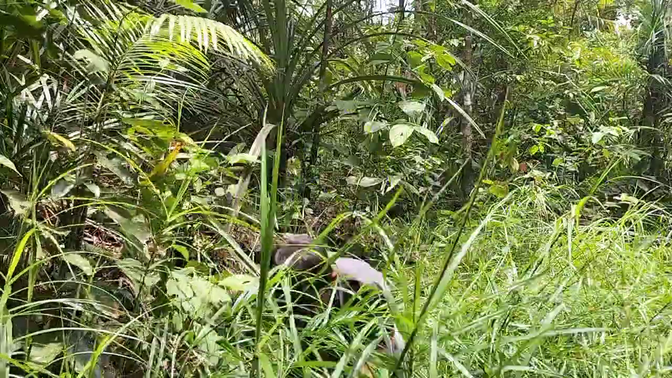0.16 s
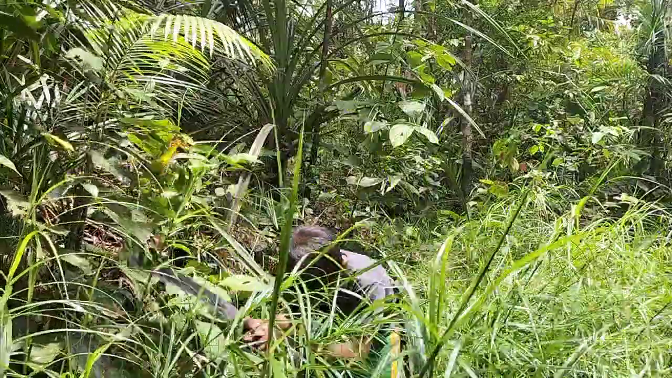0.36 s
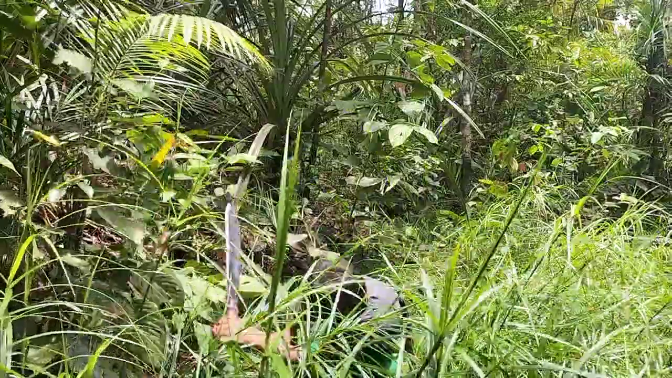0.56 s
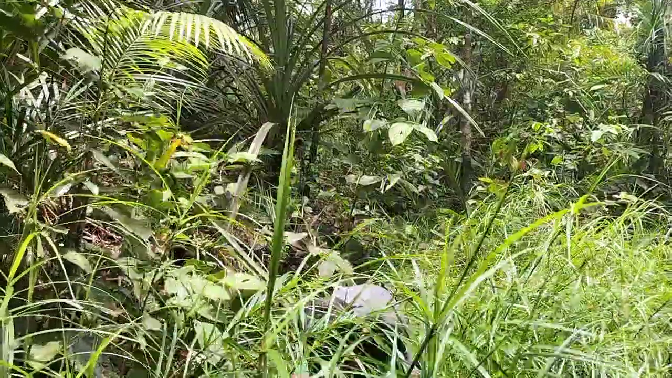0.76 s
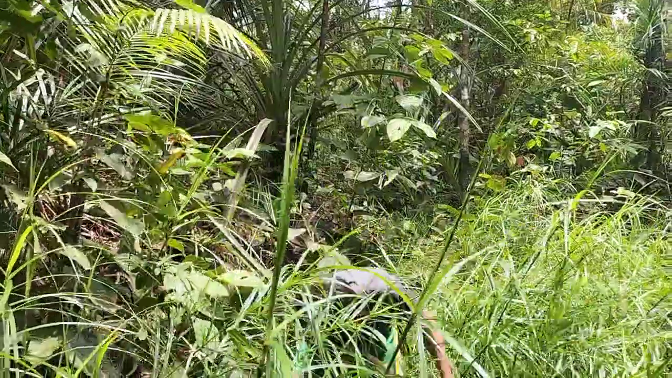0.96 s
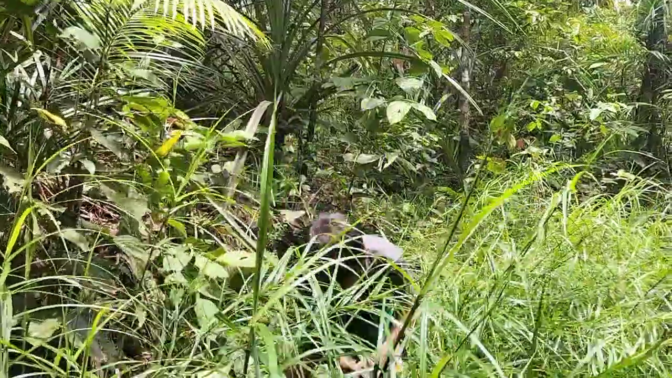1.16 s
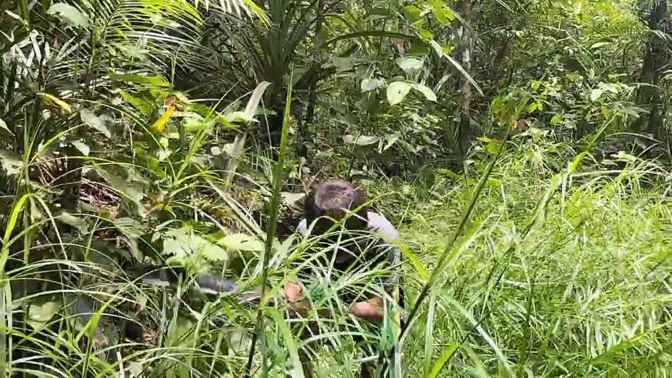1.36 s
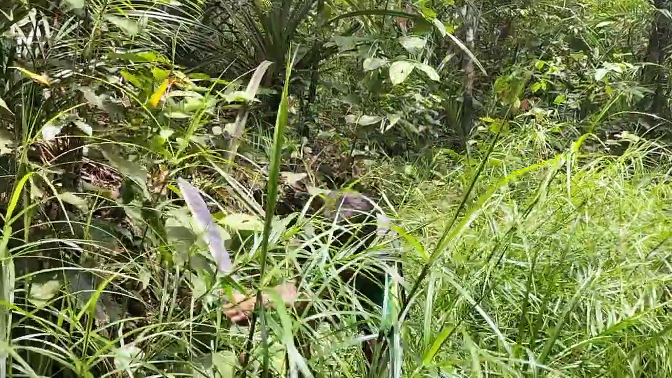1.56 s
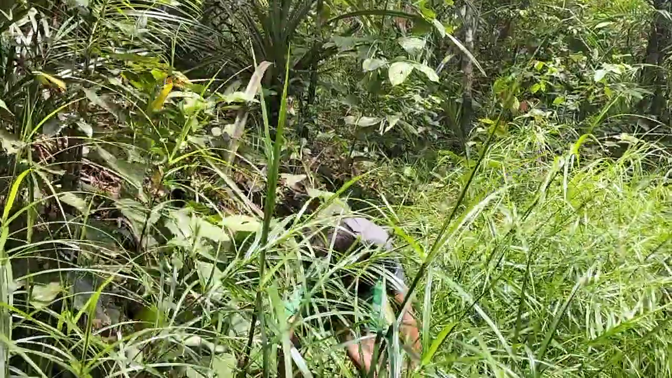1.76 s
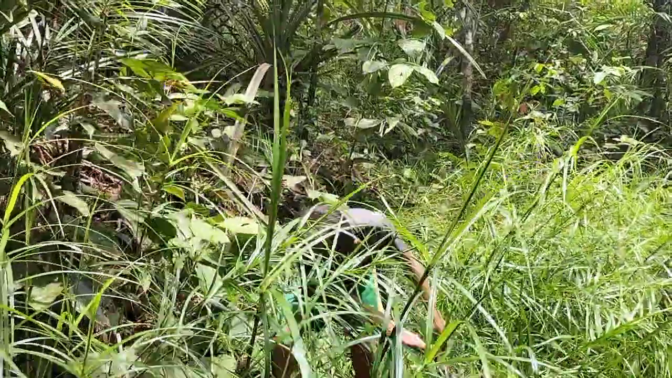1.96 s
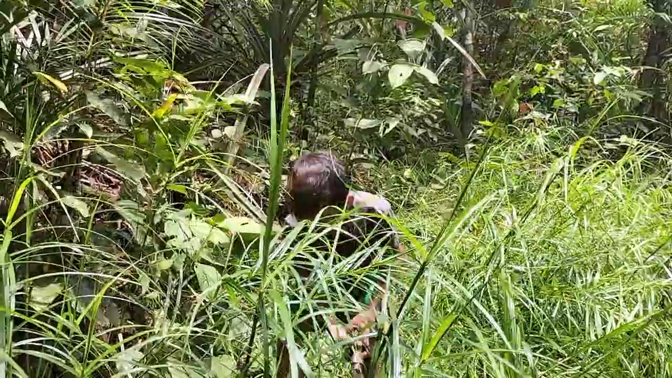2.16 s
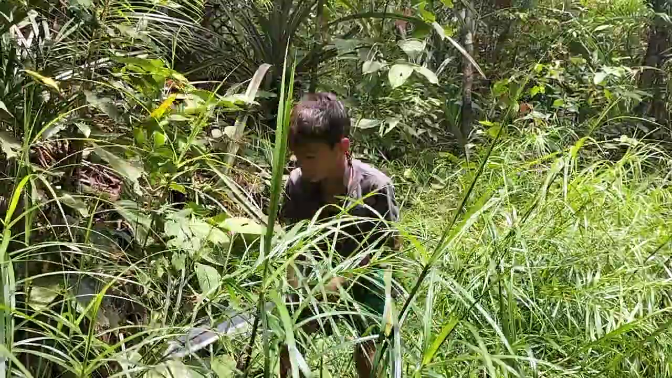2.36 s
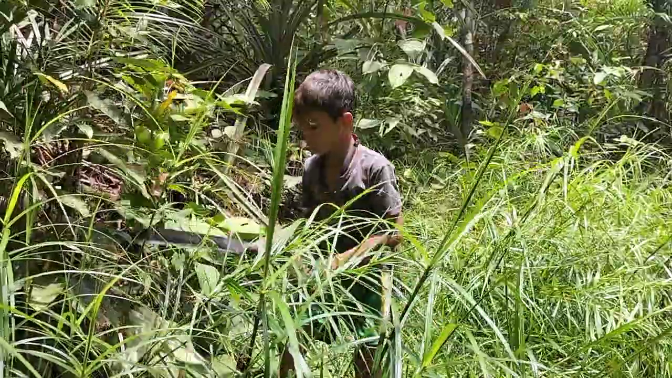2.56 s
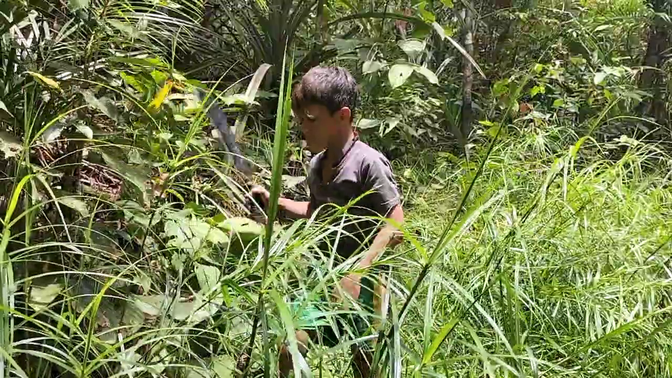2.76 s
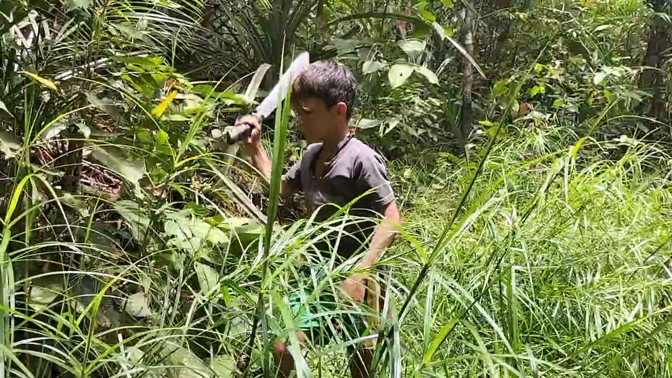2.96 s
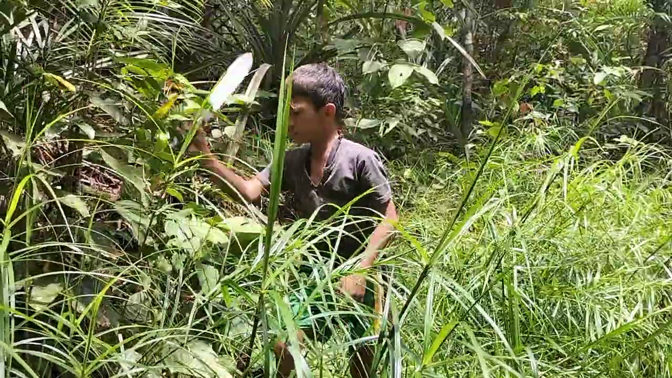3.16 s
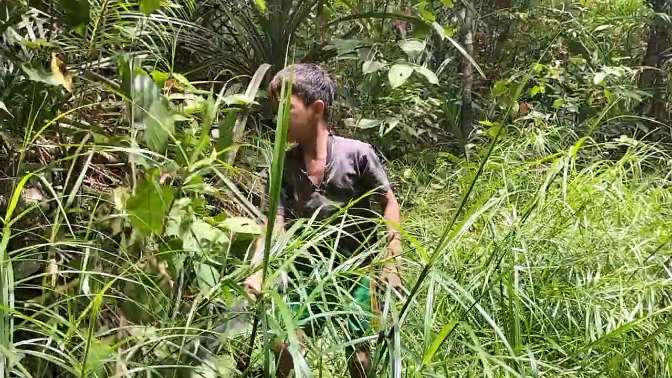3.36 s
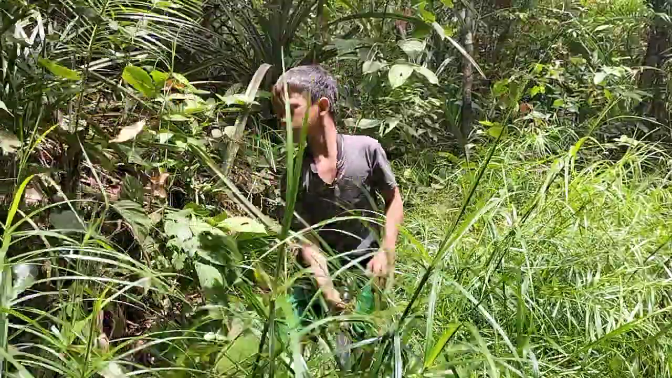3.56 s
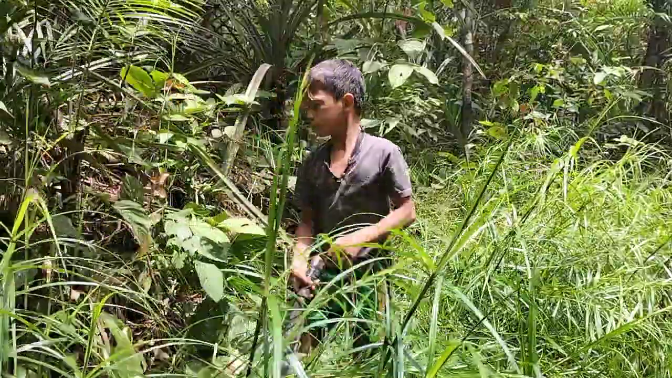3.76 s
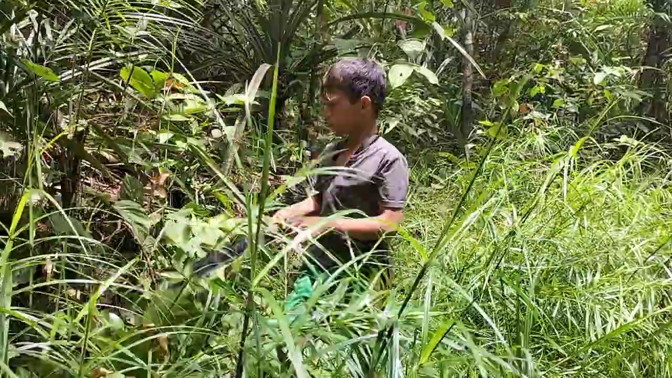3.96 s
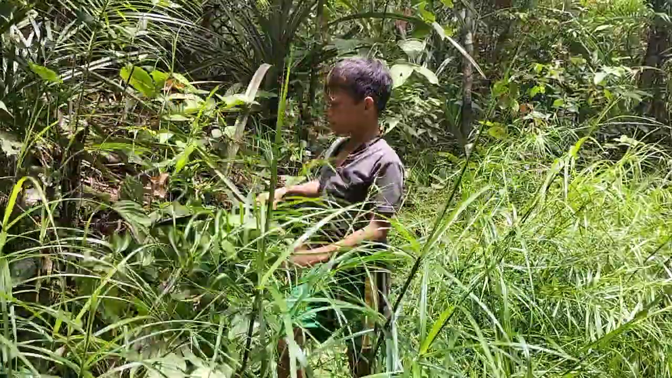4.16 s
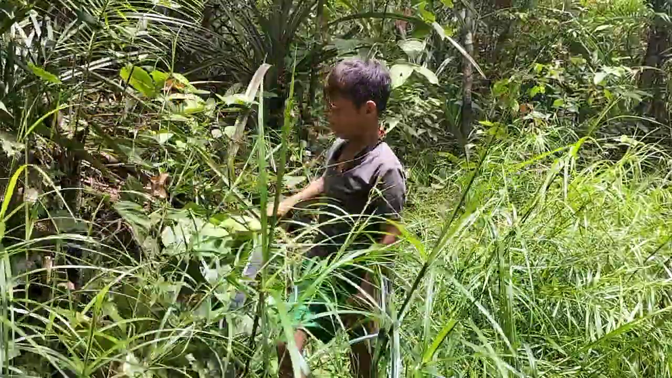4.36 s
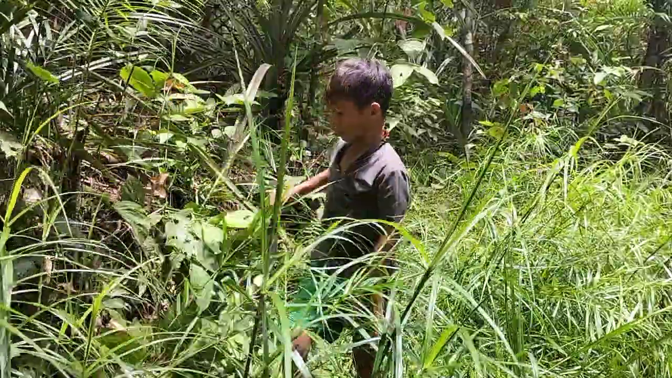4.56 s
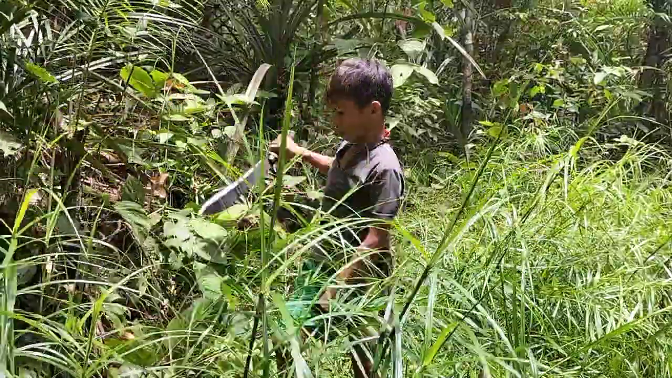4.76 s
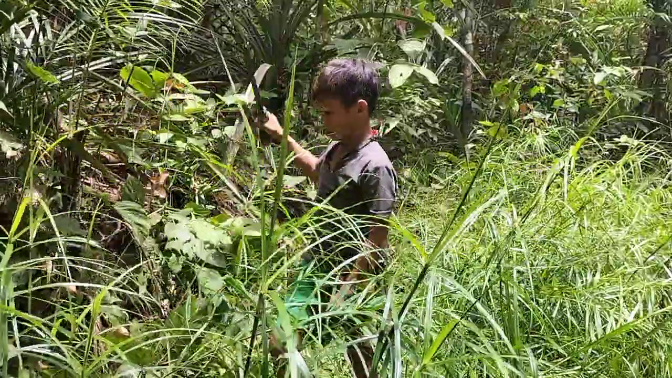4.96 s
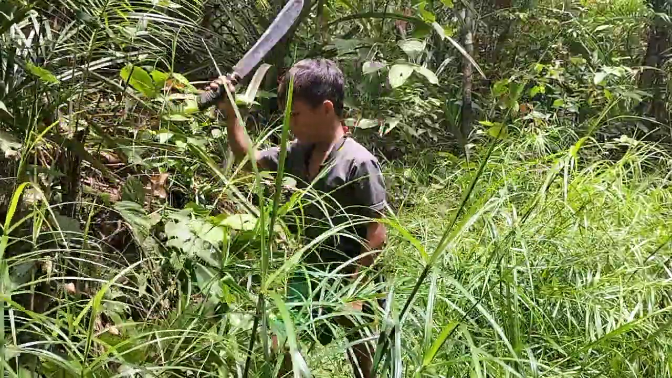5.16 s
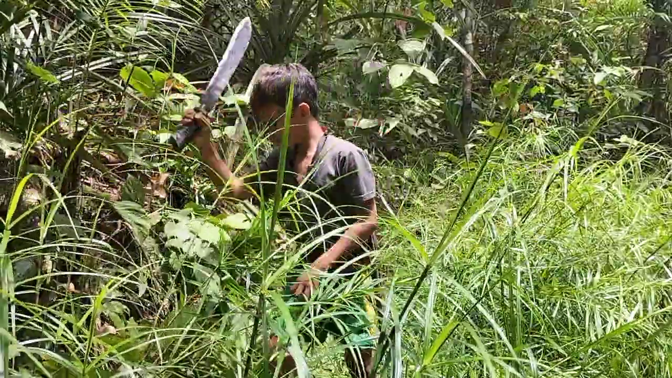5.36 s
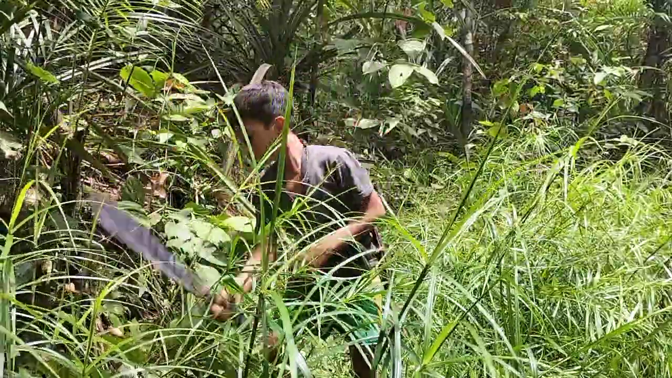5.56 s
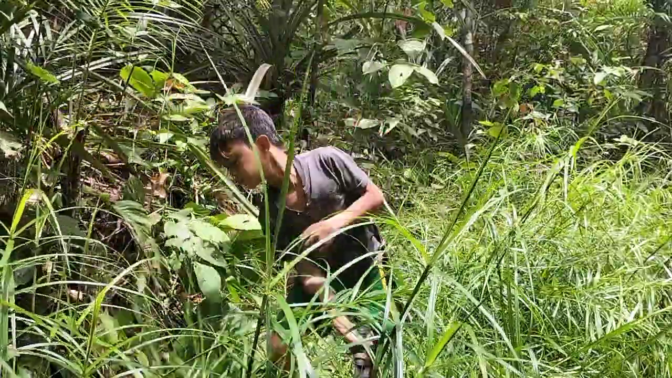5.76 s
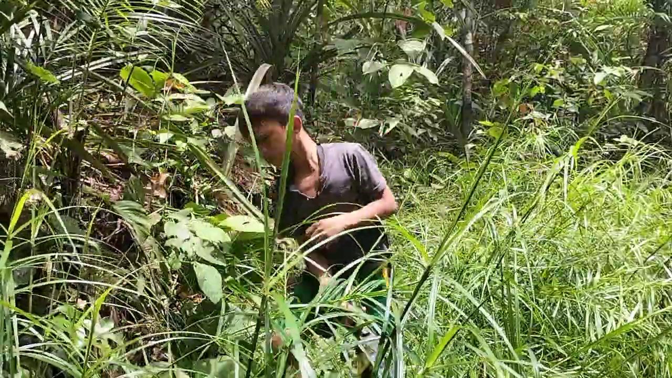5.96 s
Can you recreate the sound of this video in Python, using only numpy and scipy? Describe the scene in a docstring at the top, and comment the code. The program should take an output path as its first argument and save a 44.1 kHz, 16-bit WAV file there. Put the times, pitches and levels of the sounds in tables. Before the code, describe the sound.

Already mid-slash, a blade tears through leaves and stems, then four more strokes follow at uneven intervals, crunchy and bright with fibres snapping and soil thudding dully. Between them brush rustles, stalks scrape and sticks knock lightly. Quiet insects buzz steadily and a distant bird trills twice. Outdoors among trees, mono, fairly close, with only a faint diffuse echo.

```python
"""A blade slash tears into leaves and stems at once; four more strokes follow through grass and brush.
Leaves and stems are dense random grains of snapping fibre, filtered to the plant and left to settle.
Between strokes the brush rustles and scrapes, damped modal sticks knock and heavy blows thud in the soil.
Behind: pulsed narrow-band noise for insects, filtered noise for foliage, two short trills of a far bird.
A faint diffuse echo follows the work in the brush."""
import sys
import numpy as np
from scipy import signal
from scipy.fft import rfft, irfft, next_fast_len
from scipy.io import wavfile
from scipy.ndimage import uniform_filter1d

SR = 44100
rng = np.random.default_rng(int(sys.argv[2]) if len(sys.argv) > 2 else 0)


def unload_audio(sound):
    """Save the sound as a 16-bit wav file, at the path given as the first command line argument."""
    columns = np.transpose(np.atleast_2d(sound))
    # keep every value between -1 and 1, then stretch to whole-number steps
    steps = np.round(np.clip(columns, -1, 1) * 32767)
    wavfile.write(sys.argv[1], SR, steps.astype(np.int16))


N = 265728
TIME_S = np.arange(N) / SR
TOP_HZ = 15850

# blade through leaves: t/s, level/dB, glide to level/s, entry level re level/dB, settling t60/s,
# stalk body/dB, fine tips/dB
STROKES = [(0.0, -32.5, 0.0059, 14.5, 0.68, -5.5, 2), (.823, -31.5, 0.093, -4.5, 0.73, -2.5, 2),
           (1.807, -34, 0.087, -5, 0.71, 1, 2.5), (3.349, -32, 0.069, -7, 0.89, 7.5, 0.5),
           (5.702, -35, 0.12, -0.5, 0.67, 5, 0.5)]
# stems severed or snapped: peak t/s, level/dB, e-fold rise/s, stalk body/dB, fine tips/dB
STEM_CUTS = [(.002, -30, 0.00098, -1, 6), (0.13, -39, 0.0052, -12, -1), (0.8234, -41, 0.00058, 10, 4),
             (.875, -18, 0.005, 6, 3.5), (1.419, -43.5, .0014, 10, -5), (1.812, -40, 0.00071, 26, -3),
             (1.835, -30, .0024, 11, 14), (1.851, -18, .002, 3.5, 4.5), (1.875, -26.5, .0026, 1.5, 10.5),
             (3.382, -24, .012, 1.5, 1), (3.391, -20.5, 0.00075, .5, 1.5), (3.419, -26, .001, 6, 12.5),
             (3.445, -31, 0.00051, 8, 4), (3.4687, -21, .001, 5, -12), (4.0132, -46.5, 0.00037, 7, 10),
             (4.079, -40, 0.00042, -2, -6), (4.112, -42.5, .004, 8, 1), (4.777, -54.5, 0.00093, 6, -4),
             (5.7045, -25, .0009, -3, 4.5), (5.7173, -19, 0.0033, 8.5, -10), (5.764, -28.5, .0022, 9, 6),
             (5.828, -30, .004, 18, 3)]
# sticks and stalks knocked: t/s, level/dB, pitch ratio, brightness/(dB/octave), rebound delay/s
STICK_KNOCKS = [(0.3946, -34.5, .98, -8, .005), (0.468, -50, .9, -11, 0.00416),
                (0.498, -46.5, 0.98, -7, 0.00414), (.755, -49.5, 1.2, -2.5, 0.0031),
                (1.417, -40, 1.285, -4, 0.011), (1.752, -43, 0.87, -13, .013), (2.181, -50, 1.6, -7, .011),
                (2.609, -60, 1, -3, .004), (3.654, -43, 1.36, -6, 0.0073), (3.696, -43, 1.2, -10, 0.027),
                (3.766, -39.5, 1.1, 0.5, 0.00301)]
# stick on soft soil, modes at pitch ratio 1 before brightness tilt: f/Hz, level/dB, t60/s
STICK_MODES = [(223, -33.5, 0.023), (593, -6.5, 0.033), (750, 2, 0.025), (862, -3, 0.047), (1324, 3, 0.023),
               (1846, 2.5, 0.038), (2280, 4.5, 0.023), (2585, 9.5, 0.028)]
# heavy blows carried to the roots: t/s, level/dB, f/Hz
ROOT_THUDS = [(.002, -53.5, 149), (.825, -50.5, 223), (0.865, -38.5, 193), (1.42, -57.5, 170),
              (1.846, -43, 247), (3.392, -33.5, 164), (5.712, -40.5, 172), (5.772, -42.5, 203)]
# brush pushed about: middle t/s, length/s, leaf level/dB, stalk level/dB, tips re leaves/dB
BRUSH_PUSHES = [(0.345, .062, -54.5, -78, 10), (0.431, 0.14, -50, -52, -3), (1.285, 0.13, -50, -57, 0.5),
                (1.438, 0.092, -55, -53, -5), (1.784, 0.059, -53, -48, -9), (1.979, 0.057, -38, -51, -4),
                (3.705, 0.16, -50, -43.5, -5), (3.898, .08, -59, -53.5, -9),
                (4.115, 0.33, -56, -49.5, -4.5), (4.329, 0.085, -57, -53.5, -3),
                (4.423, 0.092, -58.5, -53, -7), (4.567, 0.21, -64, -60, -14), (5.68, .15, -61.5, -48, -6)]
# leaf spectrum: f/Hz, relative level/dB
LEAF_COLOUR = [(40, -47), (90, -17), (170, -10.5), (320, -9), (850, 1.5), (1900, -1), (2800, 5.5),
               (4000, 3), (4600, -0.5), (7600, 4.5), (9400, -18.5), (10800, -18.5), (12000, -10),
               (13200, -13), (15500, -5)]
# snapping stem spectrum: f/Hz, relative level/dB
STEM_COLOUR = [(60, -41), (160, -17.5), (400, 3), (850, 8), (1700, 5.5), (2700, 9), (3900, 13), (4700, 9.5),
               (7500, 7), (9400, -12.5), (10800, -17.5), (12000, -8), (13200, -14.5), (15500, -5)]
# stalk scraping on stalk, spectrum: f/Hz, relative level/dB
SCRAPE_COLOUR = [(50, -40), (150, -13.5), (300, -6), (550, 0), (1400, 3), (1950, -1.5), (2750, 4.5),
                 (3800, -2.5), (5000, -5), (9000, -53), (15500, -35)]
# far foliage spectrum: f/Hz, relative level/dB
FOREST_COLOUR = [(25, -9), (70, -5), (150, -1.5), (370, 1.5), (520, -1), (1300, 0.5), (1700, -9),
                 (2200, -10), (2650, 0.5), (3000, -12.5), (7200, -11), (8400, -18.5), (9500, -42),
                 (11200, -27), (11900, -18.5), (12700, -29), (15500, -29)]
# insect chorus: f/Hz, half-width near -6 dB/Hz, level/dB, mean pulse rate/(1/s)
INSECTS = [(3910, 35, -63.5, 520), (3756, 250, -66, 28), (4110, 100, -65.5, 43), (4450, 280, -66, 82),
           (5700, 290, -72.5, 120)]
# far bird phrases: first note middle t/s, length/s, mean f/Hz, level/dB
BIRD_TRILLS = [(2.366, .32, 2910, -62), (4.562, .24, 3036, -59)]

STROKE_ATTACK_S = 0.0038  # first leaves meet the blade
STALK_SHARE, STALK_T60_S = 1, 0.65  # share of low rustle that dies early, and its decay
CUT_T60_S, CUT_REF_DB = 0.083, -20  # decay of a bunch at the reference level
CUT_DOUBLING_DB = 45  # this much louder lasts twice as long
REBOUND_DB = -6  # second touch re first
THUD_T60_S = 0.082
JERK_DB, JERK_S = 1.5, .03  # rms of catch-and-slip, smoothing time
SWAY_LEAF_DB, SWAY_STALK_DB, SWAY_T60_S = -59, -58, 4.26
RATTLE_PER_S = 9
RATTLE_DB, RATTLE_SPREAD_DB = 0, 1.5  # re stalk motion
NOTE_GAP_S, NOTE_S, NOTE_SCATTER = 0.078, 0.074, 0.0073  # scatter: relative rms of pitch
FOREST_DB = -69.5


def strokes():
    """Blade enters at once, glides to full level, then the shaken plants settle, stalks before leaves."""
    out, t = np.zeros(N), np.arange(SR) / SR
    low_pass = signal.butter(1, 1500, fs=SR, output="sos")
    for start_s, level_db, swell_s, entry_db, t60_s, stalk_db, tips_db in STROKES:
        fibres = crackle(len(t), rate_per_s=9000, spread_db=2.8, ring_s=.0002)
        ticks = patchy(fibres, spread_db=2.6, hold_s=.02)
        leaves = shape(ticks, lambda hz: plant(hz, LEAF_COLOUR, stalk_db, tips_db))
        body = signal.sosfilt(low_pass, leaves)
        leaves = leaves - body * STALK_SHARE * (1 - fade(t - swell_s, STALK_T60_S))
        attack = np.minimum(t / STROKE_ATTACK_S, 1)
        glide = undb(entry_db * np.maximum(1 - t / swell_s, 0))
        force = attack * glide * fade(t - swell_s, t60_s)
        add(out, start_s, undb(level_db) * force * leaves)
    return out


def cuts():
    """Stems load up on the edge and give way in dense snaps; louder bunches decay more slowly."""
    out, t = np.zeros(N), np.arange(SR // 4) / SR
    for peak_s, level_db, rise_s, stalk_db, tips_db in STEM_CUTS:
        lead_s = 3 * rise_s
        t60_s = CUT_T60_S * 2 ** ((level_db - CUT_REF_DB) / CUT_DOUBLING_DB)
        force = np.exp(np.minimum(t - lead_s, 0) / rise_s) * fade(t - lead_s, t60_s)
        fibres = crackle(len(t), rate_per_s=12000, spread_db=2.6, ring_s=.0002)
        snaps = force * patchy(fibres, spread_db=2.8, hold_s=.05)
        burst = shape(snaps, lambda hz: plant(hz, STEM_COLOUR, stalk_db, tips_db))
        force_rms = np.sqrt(np.mean(force ** 2))
        add(out, peak_s - lead_s, undb(level_db) * burst * force_rms)
    return out


def knocks():
    """A knocked stick springs back and touches again, more softly."""
    out = np.zeros(N)
    for start_s, level_db, pitch, bright_db, rebound_s in STICK_KNOCKS:
        add(out, start_s, undb(level_db) * stick(pitch, bright_db))
        add(out, start_s + rebound_s, undb(level_db + REBOUND_DB) * stick(pitch, bright_db))
    return out


def stick(pitch, bright_db):
    """A short splintering contact rings damped modes, slightly detuned on every touch."""
    t = np.arange(SR // 8) / SR
    mode_hz, mode_db, t60_s = np.transpose(STICK_MODES)[:, :, None]
    hz = mode_hz * pitch * (1 + 0.025 * rng.standard_normal(mode_hz.shape))
    gain = undb(mode_db + bright_db * np.log2(hz / 1000))
    tones = np.sin(2 * np.pi * (hz * t + rng.random(hz.shape)))
    ring = np.sum(gain * fade(t, t60_s) * tones, axis=0)
    contact = 0.25 * rng.standard_normal(len(t)) * fade(t, t60_s=0.019)
    contact[0] = 1
    struck = signal.fftconvolve(contact, ring)[:len(t)]
    # the knock keeps little bass below about 190 Hz
    knock = signal.sosfilt(signal.butter(2, 190, "high", fs=SR, output="sos"), struck)
    return knock / np.std(knock[:SR // 100])  # level set by the first 10 ms


def thuds():
    """Roots and soil answer heavy blows with a dull bump: decaying noise in a low band."""
    out, t = np.zeros(N), np.arange(SR // 4) / SR
    force = fade(t, THUD_T60_S)
    force_rms = np.sqrt(np.mean(force ** 2))
    for start_s, level_db, pitch_hz in ROOT_THUDS:
        soil = signal.butter(4, [.75 * pitch_hz, 1.6 * pitch_hz], "band", fs=SR, output="sos")
        bump = signal.sosfilt(soil, force * rng.standard_normal(len(t)))
        add(out, start_s, undb(level_db) * unit(bump) * force_rms)
    return out


def stirring():
    """Leaves brush, stalks scrape and rattle as the cutter shifts and pulls the brush aside."""
    leaf_fibres = crackle(N, rate_per_s=7000, spread_db=2.9, ring_s=.0003)
    ticks = patchy(leaf_fibres, spread_db=3.2, hold_s=.05)
    stalk_fibres = crackle(N, rate_per_s=8000, spread_db=2.4, ring_s=.0003)
    rubs = patchy(stalk_fibres, spread_db=4.4, hold_s=.1)
    leaves = shape(ticks, lambda hz: colour(hz, LEAF_COLOUR) / np.hypot(1, (5200 / hz) ** 2))
    tips = signal.sosfiltfilt(signal.butter(4, 9500, "high", fs=SR, output="sos"), leaves)
    stalks = shape(rubs, lambda hz: colour(hz, SCRAPE_COLOUR))
    leaf_motion, tip_motion, stalk_motion = brush_motion()
    rustle = leaf_motion * (leaves - tips) + tip_motion * tips
    return rustle + stalk_motion * stalks + rattle(stalk_motion)


def brush_motion():
    """Gains of leaves, tips, stalks: jerky pushes and the slow sway after strokes, summed in power."""
    _, _, leaf_db, stalk_db, tips_db = np.transpose(BRUSH_PUSHES)
    push_power = np.array([swell(middle_s, length_s) for middle_s, length_s, *_ in BRUSH_PUSHES]) ** 2
    sway_power = sum((TIME_S > s) * fade(TIME_S - s, SWAY_T60_S) ** 2 for s, *_ in STROKES)
    # the brush catches and slips
    jerks = undb(JERK_DB * unit(uniform_filter1d(rng.standard_normal(N), int(JERK_S * SR))))
    levels = [
        (leaf_db, SWAY_LEAF_DB),
        (leaf_db + tips_db, SWAY_LEAF_DB),
        (stalk_db, SWAY_STALK_DB),
    ]
    motions = []
    for push_db, sway_db in levels:
        power = undb(push_db) ** 2 @ push_power + undb(sway_db) ** 2 * sway_power
        motions.append(jerks * np.sqrt(power))
    return motions


def rattle(motion):
    """Small sticks touch at random, as hard as the stalks are moving."""
    out, count = np.zeros(N), int(RATTLE_PER_S * N / SR)
    starts = rng.integers(0, N, count)
    draws = rng.uniform(-0.94, 1, (count, 2))
    for i, (size, pitch) in zip(starts, draws):
        gain = motion[i] * undb(RATTLE_DB + RATTLE_SPREAD_DB * size)
        add(out, i / SR, gain * stick(1.2 + .25 * pitch, bright_db=9))
    return out


def trees(x, wet_db=-17, t60_s=0.37):
    """Trunks and leaves scatter a faint, dull echo: low-passed noise, building up then decaying."""
    t = np.arange(SR) / SR
    echo = shape(rng.standard_normal(SR), lambda hz: 1 / np.hypot(1, hz / 4500))
    echo = echo * fade(t, t60_s) * np.minimum(t / 0.046, 1)
    return x + undb(wet_db) * signal.fftconvolve(x, echo / np.linalg.norm(echo))[:N]


def bird():
    """Runs of thin, evenly spaced notes, broken up and blurred on their way through the trees."""
    noise = rng.standard_normal((2, N))
    blur = unit(uniform_filter1d(uniform_filter1d(noise, SR // 220), SR // 220))
    out = np.zeros(N)
    for first_s, length_s, hz, level_db in BIRD_TRILLS:
        for note in range(round(length_s / NOTE_GAP_S)):
            note_hz = hz * (1 + NOTE_SCATTER * rng.standard_normal())
            phase = 2 * np.pi * note_hz * TIME_S
            tone = blur[0] * np.sin(phase) + blur[1] * np.cos(phase)
            out += undb(level_db) * swell(first_s + note * NOTE_GAP_S, NOTE_S) * tone
    return out


def forest():
    """Steady insect chorus over the soft noise wash of far foliage."""
    out = undb(FOREST_DB) * shape(rng.standard_normal(N), lambda hz: colour(hz, FOREST_COLOUR))
    # the low part of the wash swells once
    low_wash = shape(rng.standard_normal(N), lambda hz: resonance(hz, centre_hz=446, width_hz=190))
    out += undb(-70.5) * np.exp(-((TIME_S - 2.6) / 0.38) ** 2) * low_wash
    for centre_hz, width_hz, level_db, rate_per_s in INSECTS:
        out += undb(level_db) * buzz(centre_hz, width_hz, rate_per_s)
    return out


def buzz(centre_hz, width_hz, rate_per_s):
    """Insects rasp: slightly uneven, shallow pulses of friction noise in a narrow resonance."""
    waver = unit(uniform_filter1d(rng.standard_normal(N), SR // 8))
    phase = 2 * np.pi * np.cumsum(rate_per_s * (1 + 0.0394 * waver)) / SR
    pulses = 1 + 0.089 * np.cos(phase)
    return shape(pulses * rng.standard_normal(N), lambda hz: resonance(hz, centre_hz, width_hz))


def crackle(length, rate_per_s, spread_db, ring_s):
    """Fibres snap at random: tiny damped grains, each at its own pitch, a few much bigger."""
    draw = rng.random((int(length * rate_per_s / SR) + 1, 4))
    t = np.arange(128) / SR
    size = undb(-spread_db * np.log(.01 + .99 * draw[:, :1]))
    tones = np.cos(2 * np.pi * (draw[:, 1:2] * TOP_HZ * t + draw[:, 2:3]))
    grains = size * np.exp(-t / ring_s) * tones
    where = (draw[:, 3:] * length).astype(int) + np.arange(len(t))
    return np.bincount(where.ravel(), grains.ravel(), length)[:length]


def patchy(x, spread_db, hold_s, size=512):
    """Each leaf or stalk sounds briefly at its own pitches: narrow bands flare and die at random."""
    _, _, bands = signal.stft(x, nperseg=size)
    keep = np.exp(-size / 2 / SR / hold_s)  # per half-window hop
    noise = uniform_filter1d(rng.standard_normal(bands.shape), size=3, axis=0)
    flare = unit(signal.lfilter([1], [1, -keep], noise))
    gain = undb(spread_db * np.clip(flare, -2, 2))
    return unit(signal.istft(bands * gain, nperseg=size)[1][:len(x)])


def plant(hz, points, stalk_db, tips_db, stalk_hz=1900, tips_hz=9000):
    """Plant spectrum gain: thick stalks weight the body, fine leaf tips the sizzle."""
    body_db = stalk_db / (1 + (hz / stalk_hz) ** 2)
    sizzle_db = tips_db * (1 + np.tanh((hz - tips_hz) / 1000)) / 2
    return colour(hz, points) * undb(body_db + sizzle_db)


def colour(hz, points):
    """Gain of a (f/Hz, level/dB) spectrum, interpolated over log frequency."""
    f, db = np.transpose(points)
    return undb(np.interp(np.log(hz), np.log(f), db))


def resonance(hz, centre_hz, width_hz):
    """Gain of a band-pass around centre_hz."""
    return 1 / (1 + ((hz ** 2 - centre_hz ** 2) / (hz * 1.95 * width_hz)) ** 2)


def shape(x, gain):
    """Filter by a function from Hz to gain; rms 1."""
    size = next_fast_len(len(x))
    hz = np.maximum(np.fft.rfftfreq(size, 1 / SR), 1)
    return unit(irfft(rfft(x, size) * gain(hz), size)[:len(x)])


def swell(middle_s, length_s):
    """Gaussian rise and fall, 1/e at half a length from the middle."""
    return np.exp(-np.minimum((2 * (TIME_S - middle_s) / length_s) ** 2, 20))


def fade(t, t60_s):
    """Exponential decay from t = 0, 60 dB down after t60_s."""
    return np.exp(-np.log(1000) * np.maximum(t, 0) / t60_s)


def undb(db):
    """Decibels to gain."""
    return 10 ** (np.asarray(db) / 20)


def unit(x):
    """Scale to rms 1."""
    return x / np.sqrt(np.mean(x ** 2) + 1e-20)


def add(out, start_s, x):
    """Mix x into out from start_s, clipped to the ends."""
    i = int(start_s * SR)
    x = x[max(-i, 0):max(N - i, 0)]
    out[max(i, 0):max(i, 0) + len(x)] += x


def scene():
    """Work in the brush with its echo, then forest and bird."""
    work = strokes() + cuts() + knocks() + thuds() + stirring()
    return (trees(work) + forest() + bird())[None]


def record(dry):
    """Recorder band: trims the deep bass, cuts steeply above TOP_HZ."""
    trimmed = signal.sosfilt(signal.butter(2, 60, "high", fs=SR, output="sos"), dry)
    return signal.sosfilt(signal.ellip(10, .2, 80, TOP_HZ, fs=SR, output="sos"), trimmed)


dry = scene()
out = record(dry)
unload_audio(out)
```